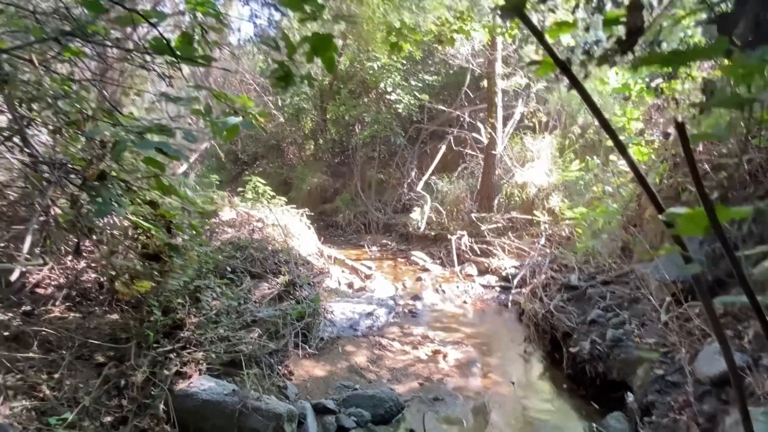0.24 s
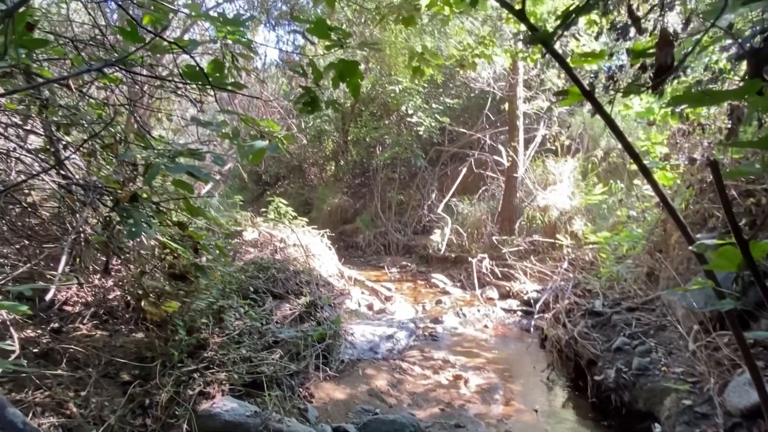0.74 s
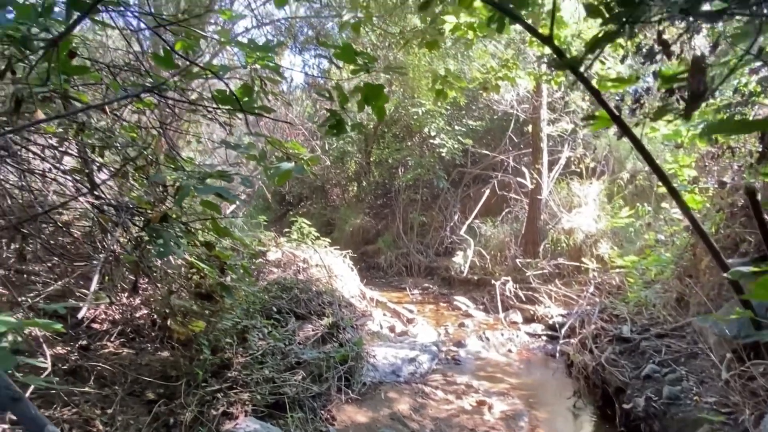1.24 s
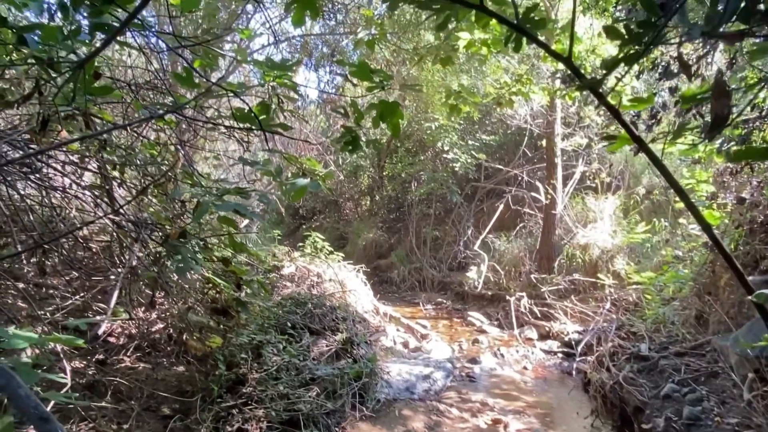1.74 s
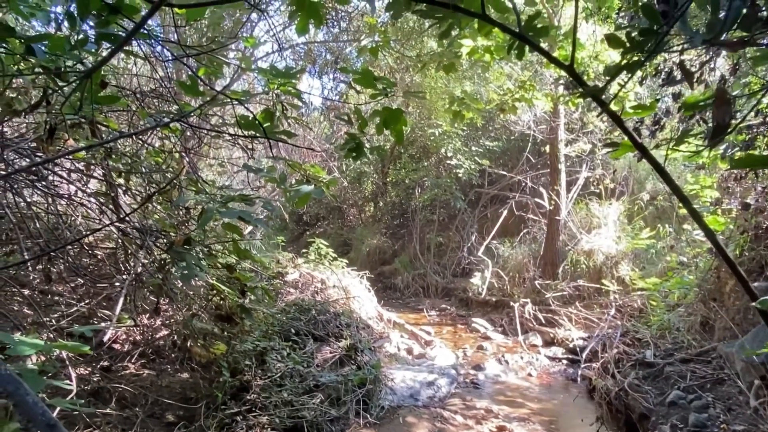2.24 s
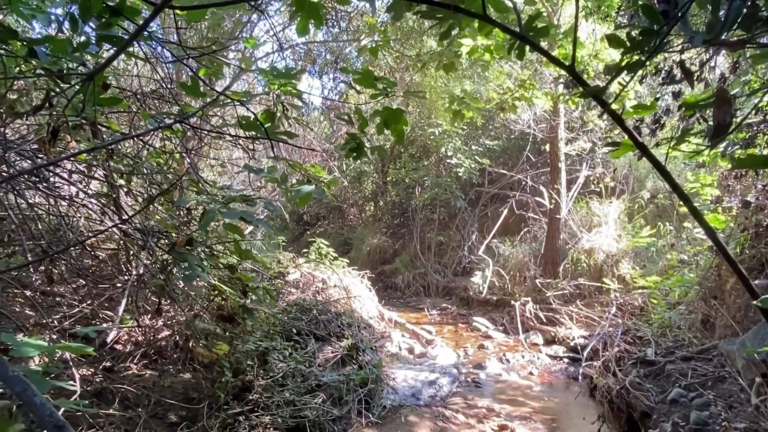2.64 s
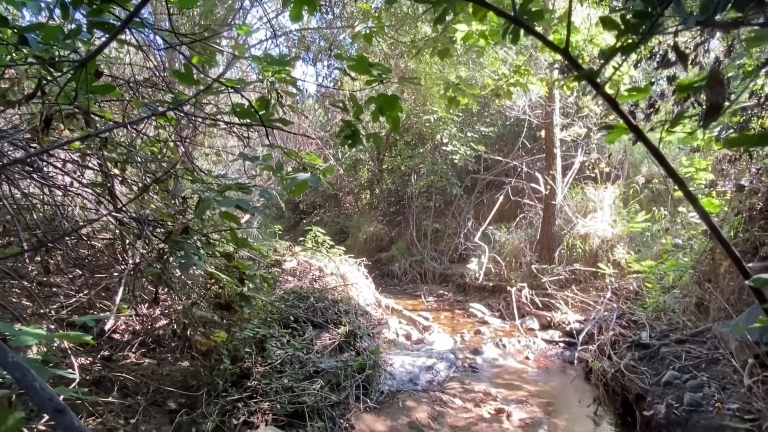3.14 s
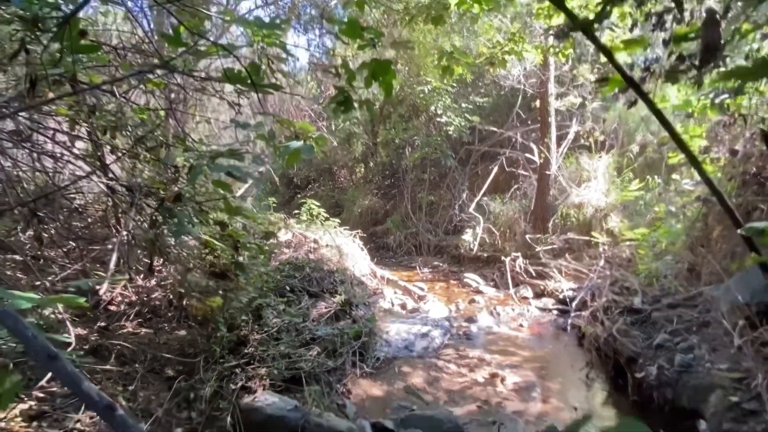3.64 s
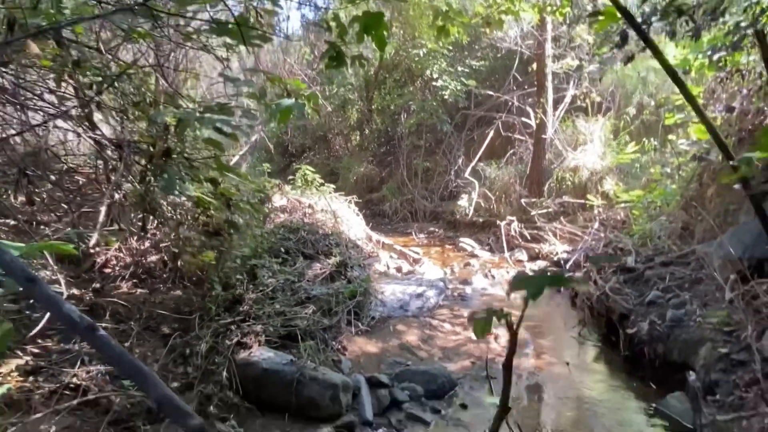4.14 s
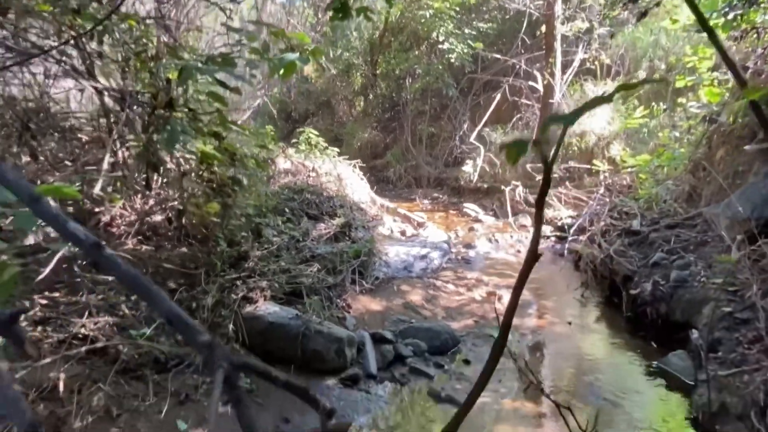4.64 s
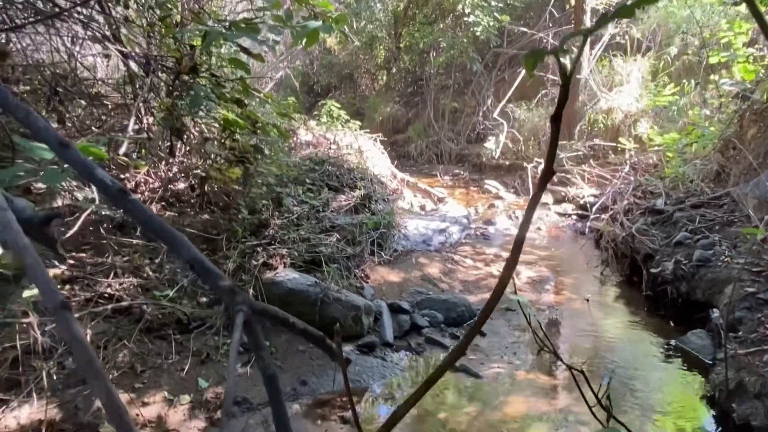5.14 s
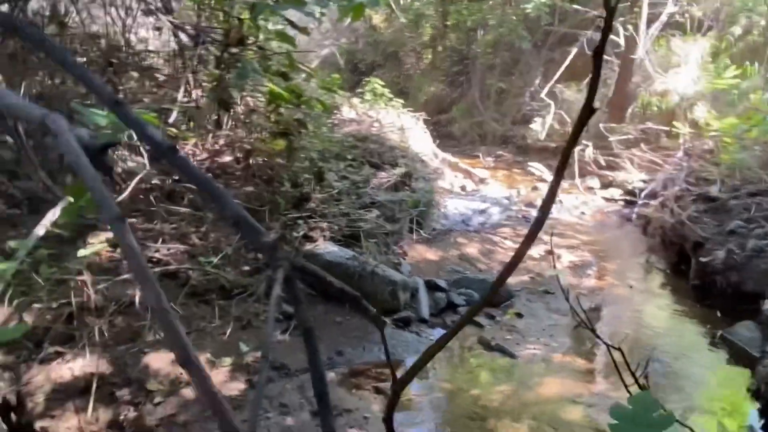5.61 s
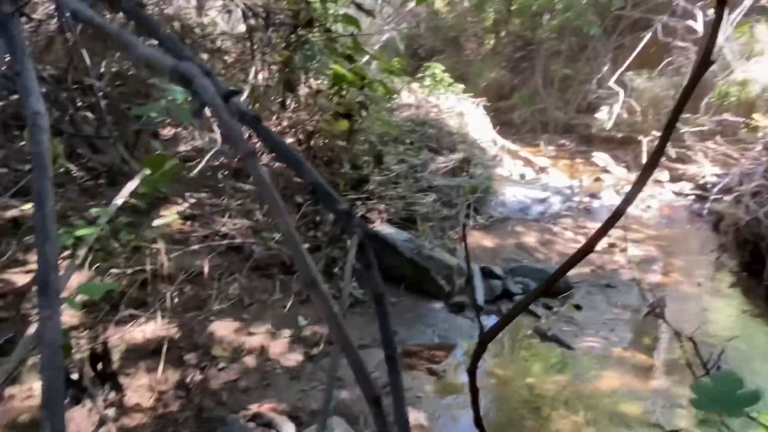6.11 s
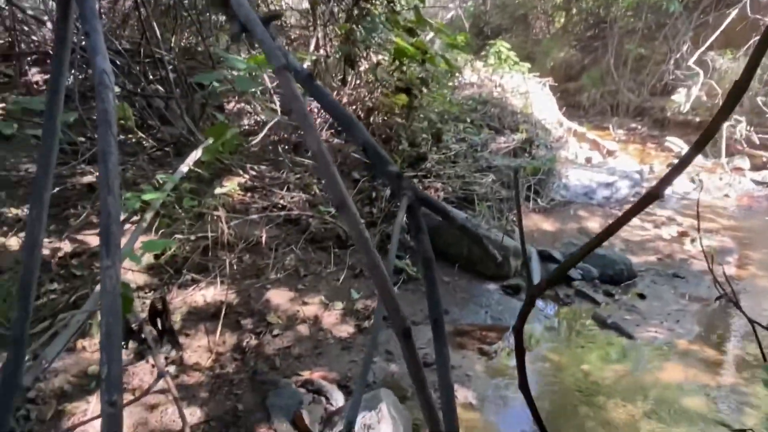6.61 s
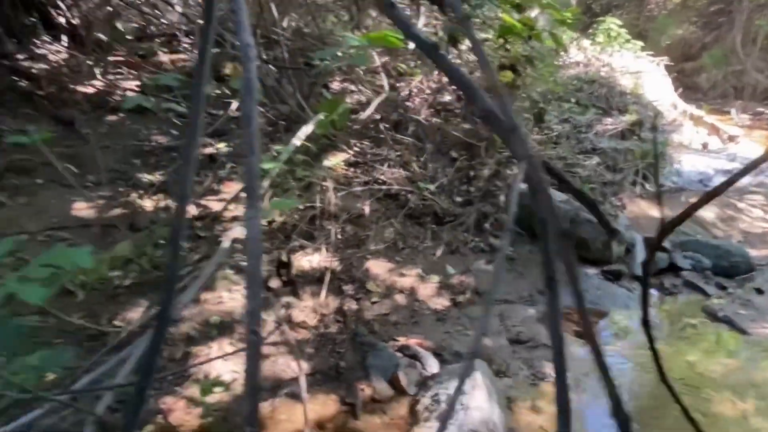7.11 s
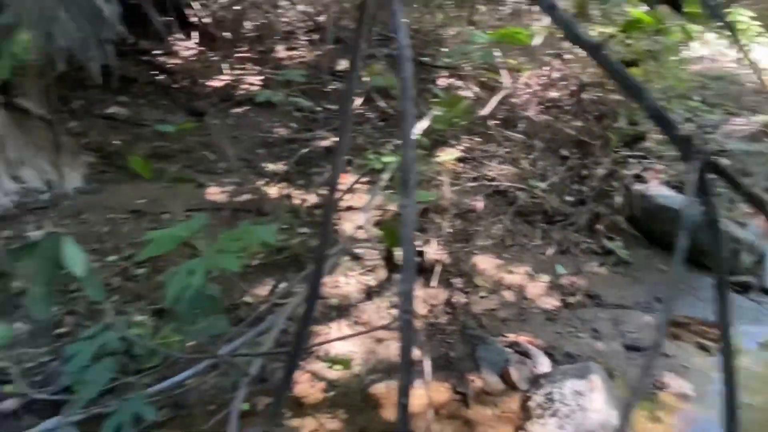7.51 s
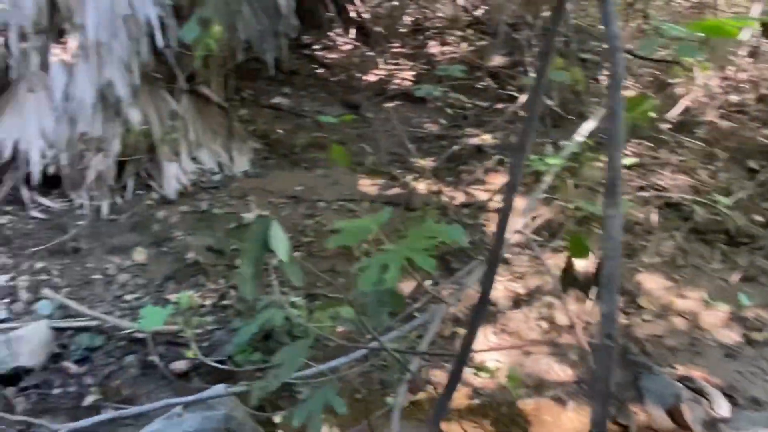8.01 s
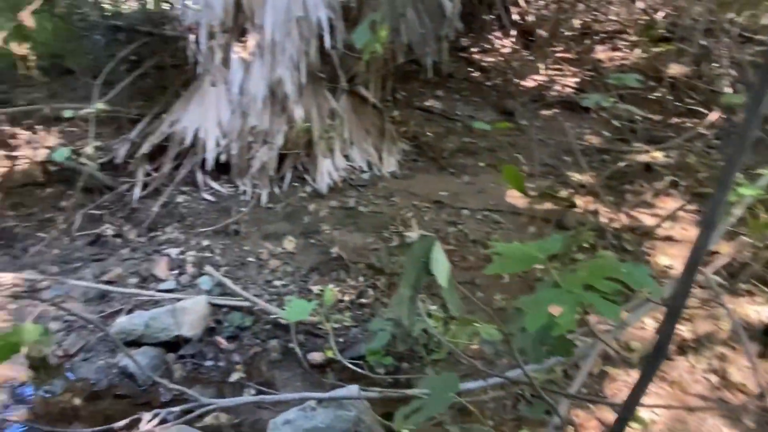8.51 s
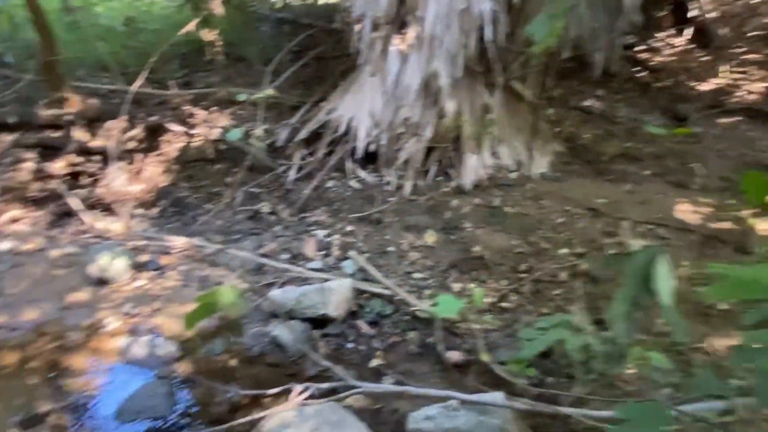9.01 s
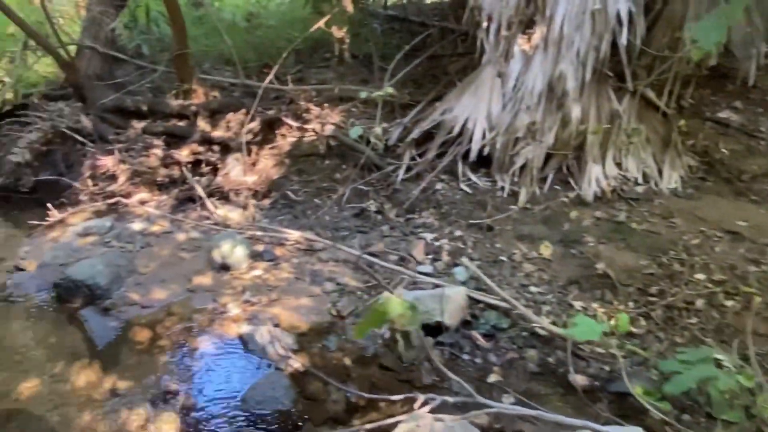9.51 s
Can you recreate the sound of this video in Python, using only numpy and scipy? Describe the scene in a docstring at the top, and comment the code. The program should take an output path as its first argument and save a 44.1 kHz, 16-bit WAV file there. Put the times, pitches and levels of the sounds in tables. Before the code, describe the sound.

Steady creek babble with low wind buffeting, a dull thump midway, then footsteps in dry leaves, sharp twig clicks and a final gritty stone scrape.

```python
"""A shallow creek trickles over stones throughout: shaped hiss, clumped splashes and rising bubble tones.
A gust rumbles at the phone's two ports for almost four seconds, with a brief flutter near its end.
Just before six seconds one large bubble glides up, low pulses thump and the phone turns from the creek.
From about seven seconds feet rustle in dry leaves and twigs tick; near the end a shoe scrapes a stone.
At times a sliding edge in frequency thins out the creek, leaves, twigs and scrape's swish below it."""
import sys
import numpy as np
from scipy import signal
from scipy.fft import rfft, irfft, next_fast_len
from scipy.io import wavfile
from scipy.ndimage import uniform_filter1d, map_coordinates

SR = 44100
rng = np.random.default_rng(int(sys.argv[2]) if len(sys.argv) > 2 else 0)


def int16_out(signal):
    """Quantize to a 16-bit WAV file."""
    q = np.round(np.clip(np.atleast_2d(signal).T, -1, 1) * 32767)
    wavfile.write(sys.argv[1], SR, q.astype(np.int16))


def makeup_ratio(level_db):
    """Linear amplitude ratio for a level in decibels (20 dB per factor of ten)."""
    decades = np.asarray(level_db, float) / 20
    return 10 ** decades


N = 429975  # samples
TIME = np.arange(N) / SR  # s
HZ = np.fft.rfftfreq(512, 1 / SR)  # bins of the short-time spectrum
FRAMES = np.arange(N // 256 + 2) * 256 / SR  # s, its frame times


def unit(x):
    """Scale to rms 1."""
    return x / np.sqrt(np.mean(x ** 2) + 1e-20)


def along(points, hz=HZ):
    """Read (frequency, value) points on a log axis."""
    f, v = np.transpose(points)
    return np.interp(np.log(hz + 1), np.log(f + 1), v)


def curves(rows, at=TIME):
    """Read each column after the first at the given times (or frequencies)."""
    first, *columns = np.transpose(rows)
    return [np.interp(at, first, column) for column in columns]


def wobble(rate):
    """A smooth random curve, rate knots a second."""
    knots = rng.standard_normal(int(N * rate / SR) + 4)
    return map_coordinates(knots, [np.arange(N) * rate / SR])


def noise():
    """Two independent streams of white noise."""
    return rng.standard_normal((2, N))


def shaped(x, gain):
    """x times a gain over frequency and time."""
    z = signal.stft(x, nperseg=512)[2]
    return signal.istft(z * gain[..., :z.shape[-1]], nperseg=512)[1][..., :N]


def coloured(x, points):
    """x through a (frequency, dB) spectrum, at rms 1."""
    m = next_fast_len(N + 8192)
    gain = makeup_ratio(along(points, np.fft.rfftfreq(m, 1 / SR)))
    return unit(irfft(rfft(x, m) * gain, m)[..., :N])


def ports(pair, alike, lead, tilt_db):
    """Two streams to left and right: a shared part, a phase lead [rad] and a level tilt."""
    angle = np.arccos(np.clip(alike, 0, 1)) / 2
    half = makeup_ratio(tilt_db / 2) * np.exp(.5j * lead) * np.ones((len(HZ), len(FRAMES)))
    shared = shaped(pair[0], np.cos(angle) * np.array([half, 1 / half]))
    opposed = shaped(pair[1], np.sin(angle) * np.array([half, -1 / half]))
    return shared + opposed


def blips(s, hz, size, cycles, rise, soft=1, count=700):
    """Damped sines of count samples with a soft start; rise above 0 lifts the pitch."""
    k = np.arange(count)
    c = k / SR * hz[:, None]  # cycles since the start
    envelope = size[:, None] * np.exp(-c / cycles) * (1 - np.exp(-c / soft))
    wave = envelope * np.sin(2 * np.pi * c * (1 + rise * c / cycles))
    index = np.round(s * SR).astype(int)[:, None] + k
    return np.bincount(index.ravel(), wave.ravel(), N + len(k))[:N]


def grains(count, centre_hz, octaves, spread_db, cycles, rise, soft=1):
    """A random crowd of blips at rms 1: half in clumps that start suddenly and thin out, a few larger."""
    when, size, late = rng.random((3, count))
    when[::2] = rng.choice(rng.random(count // 11), len(when[::2]))
    start = np.minimum(when * N / SR - .012 * np.log(late), N / SR)
    hz = np.clip(centre_hz * 2 ** (octaves * rng.standard_normal(count)), 650, 15000)
    return unit(blips(start, hz, makeup_ratio(-spread_db * np.log(size + .02)), cycles, rise, soft))


# spectrum of the rushing water: (frequency [Hz], relative level [dB])
WATER_SPECTRUM = [(480, -40.5), (620, -2), (720, -11), (900, -7), (1360, -11.5), (2000, -11), (4000, -14),
                  (5500, -20), (6300, -19), (7500, -25.5), (10400, -20), (11400, -29.5), (12100, -28),
                  (14000, -34), (15300, -36.5), (16000, -65.5)]


def rush(surge):
    """Many small falls: hiss, patchy in time and frequency, that surges, with clumps of short splashes."""
    patches = rng.standard_normal((len(HZ), len(FRAMES)))
    for axis in (0, 1):
        patches = uniform_filter1d(patches, size=6, axis=axis)
    hiss = coloured(shaped(noise(), makeup_ratio(2.0 * unit(patches))), WATER_SPECTRUM) * surge
    drops = [grains(count=2000, centre_hz=2500, octaves=.8, spread_db=4.4, cycles=2.1, rise=0, soft=.15)
             for _ in 'ab']
    splash = coloured(np.diff(drops, prepend=0), WATER_SPECTRUM)
    return makeup_ratio(-51.5) * hiss + makeup_ratio(-55.5) * splash


def bubble_crowd(surge):
    """Small bubbles ring as damped tones of slightly rising pitch and follow the surge weakly."""
    crowd = [grains(count=3600, centre_hz=1900, octaves=.65, spread_db=3.5, cycles=6.5, rise=.02, soft=.5)
             for _ in 'ab']
    return makeup_ratio(-50) * np.array(crowd) * np.sqrt(surge)


# the loudest bubbles: (time [s], strength [dB], starting pitch [Hz])
LOUD_BUBBLES = [(0.262, -35.5, 1590), (0.517, -37.5, 870), (0.559, -27.5, 2320), (0.623, -27.5, 1630),
                (0.694, -30.5, 1160), (0.954, -34, 1640), (1.103, -29, 1930), (1.358, -30.5, 960),
                (1.544, -26, 2370), (1.932, -28, 1130), (2.216, -27.5, 1750), (2.344, -27, 2280),
                (2.41, -29, 1780), (2.463, -27.5, 3900), (2.508, -27.5, 2660), (3.147, -29.5, 1950),
                (3.245, -30.5, 2080), (3.62, -27.5, 1660), (3.735, -30.5, 1860), (5.909, -27, 2360),
                (6.106, -29, 1570), (6.222, -27, 1940), (6.438, -30.5, 1130)]
# one large bubble, single row: (time [s], strength [dB], starting pitch [Hz])
GLIDING_BUBBLE = (5.722, -39, 520)


def single_bubbles():
    """Loud bubbles ring almost level in pitch; a large one rings longer and glides far up."""
    s, db, hz = np.transpose(LOUD_BUBBLES)
    loud = blips(s, hz, makeup_ratio(db), cycles=4.05, rise=0.0039, soft=0.55)
    s, db, hz = np.transpose([GLIDING_BUBBLE])
    return loud + blips(s, hz, makeup_ratio(db), cycles=11, rise=0.28, count=2600)


def creek():
    """The water's rush and bubble crowd share one uneven surge; single bubbles stand apart."""
    surge = makeup_ratio(1.5 * wobble(9) + 1.8 * wobble(19))
    return rush(surge), bubble_crowd(surge), single_bubbles()


# dry-leaf swells: (time of the peak [s], strength [dB], fade [dB per s])
LEAF_SWELLS = [(7.183, -41, 222), (7.41, -48, 70), (7.642, -40.5, 170), (7.71, -50, 146), (9.4, -50.5, 84),
               (9.52, -41, 85), (9.61, -46, 89)]
# spectrum of dry leaves: (frequency [Hz], relative level [dB])
LEAF_SPECTRUM = [(250, -54), (500, 1.5), (1300, 2.5), (2800, -2.5), (6100, -6), (7400, -11), (9700, -5.5),
                 (12000, -16.5), (15000, -34), (16200, -53.5)]


def leaves():
    """Dry leaves rustle and crackle: noise and tiny clicks swell unevenly over a shuffle."""
    rise_over_fade, shuffle_s, shuffle_db = 1.8, 7.12, -50  # the shuffle lasts from then on
    crackle = [grains(count=2500, centre_hz=6000, octaves=.7, spread_db=3, cycles=1.2, rise=0)
               for _ in 'ab']
    rustle = coloured(noise() + 0.34 * np.array(crackle), LEAF_SPECTRUM) * makeup_ratio(.8 * wobble(30))
    swells = sum(makeup_ratio(db - fade_db * np.maximum(TIME - s, rise_over_fade * (s - TIME)))
                 for s, db, fade_db in LEAF_SWELLS)
    shuffle = makeup_ratio(shuffle_db + 1.5 * wobble(6)) * np.clip((TIME - shuffle_s) / 0.02, 0, 1)
    return ports(rustle * (swells + shuffle), 0.68, 1.35, -1.9)


# twig ticks: (time [s], strength [dB], pitch [Hz], left minus right [dB])
TWIG_TICKS = [(7.1458, -21, 9600, 1), (7.951, -23, 9150, -1.5), (7.9985, -21, 10000, 4),
              (8.0998, -25, 10160, 8), (8.428, -17.5, 6840, 8), (9.363, -27, 990, 0), (9.627, -19, 9100, 4),
              (9.662, -20.5, 3730, 0), (9.669, -8.5, 9950, -9)]


def twigs():
    """Twigs tick as tones that die within a few cycles, each with its own left-right balance."""
    s, db, hz, pan_db = np.transpose(TWIG_TICKS)
    return np.array([blips(s, hz, makeup_ratio(db + side * pan_db / 2), cycles=2.1, rise=0) for side in (1, -1)])


# friction of the shoe: (time [s], force [dB])
SCRAPE_FORCE = [(9.46, -33), (9.485, -16), (9.56, -11.5), (9.59, -6), (9.63, -11), (9.68, -13), (9.7, -29),
                (9.75, -28.5)]
# slips on the stone: (time [s], force [dB])
STONE_SLIPS = [(9.481, -2), (9.575, 2), (9.591, 0), (9.612, 7), (9.66, 6), (9.674, -3), (9.72, -2.5)]
# resonances at first contact: (frequency [Hz], pole width [Hz], level [dB], drift [Hz per s], fade [dB per s])
STONE_MODES = [(800, 138, -4.5, 450, -6), (1370, 110, -8, 0, 10), (1713, 152, 0, -600, 54)]


def stone_ring():
    """Rough friction and sudden slips excite the stone's narrow resonances, which drift a little."""
    since = TIME - SCRAPE_FORCE[0][0]
    force = makeup_ratio(curves(SCRAPE_FORCE)[0] + 1.9 * wobble(90)) * noise() * (since > 0)
    for s, db in STONE_SLIPS:
        force[0, round(s * SR):][:12] += makeup_ratio(db) * np.hanning(12)
    ring = 0
    for hz, width_hz, db, drift, fade_db in STONE_MODES:
        # shift the mode to 0 Hz, low-pass it there, shift it back
        spin = np.exp(2j * np.pi * since * (hz + drift * since / 2))
        keep = np.exp(-np.pi * width_hz / SR)
        slow = signal.lfilter([(1 - keep) ** 2], [1, -2 * keep, keep ** 2], force / spin)
        level = makeup_ratio(db - fade_db * np.maximum(since, 0) + 1.7 * wobble(60))
        ring = ring + 2 * level * np.real(spin * slow)
    return ports(ring, .9, 1.2, -3.5)


# spectrum of the scrape's swish: (frequency [Hz], relative level [dB])
SWISH_SPECTRUM = [(1300, -28), (2100, 8), (4500, -10.5), (7000, -40)]


def scrape_swish():
    """A broad swish of noise follows the friction force."""
    level = makeup_ratio(curves(SCRAPE_FORCE)[0] - 30) * (TIME > SCRAPE_FORCE[0][0])
    return ports(level * coloured(noise(), SWISH_SPECTRUM), .9, 1.2, -3.5)


# short low pulses, the three near 5.97 s in one thump, the last a faint knock:
# (time of the peak [s], strength [dB], pitch [Hz], time constant [s])
LOW_PULSES = [(5.604, -28, 287, 0.0046), (5.857, -27.5, 255, 0.0076), (5.882, -26.5, 234, 0.0045),
              (5.9695, -21, 466, 0.0022), (5.9731, 0.5, 338, 0.00069), (5.9795, -20.5, 315, 0.0044),
              (8.672, -40, 296, 0.002)]


def low_pulses():
    """Short low tones swell and fade evenly: thumps, one built of three pulses, and a faint late knock."""
    tones = sum(makeup_ratio(db) * np.exp(-np.abs(TIME - s) / fade_s) * np.cos(2 * np.pi * hz * (TIME - s))
                for s, db, hz, fade_s in LOW_PULSES)
    spectrum = [(60, -86), (140, -44.5), (185, -1), (530, 3.5), (600, -15.5), (1500, -8.0), (3000, -60)]
    pulses = coloured(tones, spectrum) * np.std(tones)
    return ports([pulses, 0 * TIME], 0.96, -1.73, 1.44)


# wind rumble: (time [s], level [dB])
RUMBLE_LEVEL = [(0.0, -60), (0.32, -50.5), (0.6, -65.5), (0.73, -53.5), (1.22, -45.5), (2.36, -46.5),
                (3.64, -45), (3.72, -58), (4.02, -55), (4.45, -80.5), (5.02, -77), (5.16, -55),
                (5.24, -66.5), (5.57, -64.5), (5.65, -100), (6.11, -95.5), (6.49, -60.5), (6.68, -119),
                (6.95, -73.5), (7.71, -55.5), (8.23, -64.5), (8.28, -53), (8.55, -69), (9.15, -60.5),
                (9.38, -57.5), (9.59, -49), (9.75, -55)]
# rumble spectrum: (frequency [Hz], relative level in the long gust [dB], relative level after it [dB])
RUMBLE_SPECTRA = [(18, -32, -35), (39, -11.5, -21.5), (62.5, -2, 4), (95.5, -4, 6.5), (158, -24.5, -8),
                  (235, -60, -38)]


def rumble():
    """Lumpy low noise of the wind, with one colour in the long gust and another after it."""
    gust_ends_s = 3.7
    hz, *colours = np.transpose(RUMBLE_SPECTRA)
    gust, calm = (coloured(noise(), np.transpose([hz, db])) for db in colours)
    lumpy = unit(makeup_ratio(1.07 * wobble(9)) * np.where(np.arange(N) < gust_ends_s * SR, gust, calm))
    return ports(makeup_ratio(curves(RUMBLE_LEVEL)[0]) * lumpy, 0.78, -0.19, -5.0)


# wind flutter: (time [s], level [dB])
FLUTTER_COURSE = [(0, -66), (1.2, -58), (3.3, -57.5), (3.34, -45), (3.41, -44.5), (3.46, -57), (3.53, -46),
                  (3.62, -44), (3.68, -62), (4.3, -64), (5.5, -64.5), (5.7, -74), (6.05, -59), (6.5, -68),
                  (6.6, -105), (6.77, -105), (6.83, -70), (7.33, -53), (7.66, -53), (8.05, -61), (9, -60),
                  (9.3, -67.5), (9.5, -53.5), (9.75, -56.5)]
# flutter spectrum: (frequency [Hz], relative level [dB])
FLUTTER_SPECTRUM = [(90, -42), (140, -2.5), (300, -5.5), (455, -2.5), (600, -5.5), (760, -52.5)]


def flutter():
    """Faster, rougher noise of the wind, mostly above the rumble in pitch."""
    rough = unit(makeup_ratio(2.2 * wobble(25) + 1.2 * wobble(6)) * coloured(noise(), FLUTTER_SPECTRUM))
    return ports(makeup_ratio(curves(FLUTTER_COURSE)[0]) * rough, 0.25, -0.59, -6.5)


# dropouts of a narrow band: (time of the middle [s], half length [s], centre [Hz])
WIND_GAPS = [(4.35, 0.22, 268), (5.754, 0.035, 260), (6.744, .34, 326)]


def wind():
    """Rumble and flutter together, with a narrow band that drops out at times."""
    gap_octaves, gap_db = .5, -25
    gap = sum(np.outer(np.exp(-(np.log2((HZ + 1) / hz) / gap_octaves) ** 2),
                       np.exp(-((FRAMES - s) / half) ** 4)) for s, half, hz in WIND_GAPS)
    return shaped(rumble() + flutter(), makeup_ratio(gap_db * gap))


# slides of the edge: (time it starts down [s], time it climbs back [s], fall [Hz per s])
EDGE_SLIDES = [(-.12, 3.66, 5500), (5.6, 6.56, 12000), (9.43, 9.9, 10500)]


def edge():
    """The edge [Hz] rests high, slides down steadily to a floor and climbs back ever more slowly."""
    top_hz, low_hz, climb_s = 3900, 600, .19
    down_hz = [np.clip(fall * (np.minimum(FRAMES, back) - start), 0, top_hz - low_hz)
               * np.exp(-np.maximum(FRAMES - back, 0) / climb_s) for start, back, fall in EDGE_SLIDES]
    return top_hz - np.max(down_hz, axis=0)


# turn away from the water: (time [s], share of the turn [0-1])
PHONE_TURN = [(5.6, 0), (6.1, 0.86)]
# phase by which left leads: (frequency [Hz], facing the water [rad], turned away [rad])
LEFT_LEAD = [(500, 3.1, 3.1), (900, 1.2, 1.3), (1500, .1, .6), (2500, -.5, -1.5), (4500, -.9, -2.8),
             (6000, -.5, -1.5), (7500, -2.8, -2.8), (9500, -5.5, -5.5), (12000, -9, -9)]
# left-right likeness of the creek: (frequency [Hz], likeness [0-1])
LIKENESS = [(600, 0.81), (1000, 0.94), (2000, 0.85), (5000, 0.49), (9000, 0.39), (12000, 0.36)]
# balance of the creek: (frequency [Hz], left minus right [dB])
BALANCE = [(600, -5.5), (1400, -5.5), (3000, -0.5), (7000, -0.7)]
# base gain under the edge: (time [s], level [dB])
SINK_DEPTH = [(0, -13), (.22, -7.5), (.45, -9), (3.7, -4.5), (4.7, -8.5), (5.15, -12.5), (5.25, -4.5),
              (5.75, -2), (6.5, -6), (6.65, -2), (7, -6), (7.5, -4), (9.08, -8), (9.2, -11.5), (9.45, -9.5)]


def scene():
    """The creek's phase lead shifts as the phone turns; sounds sink below the edge, the bubble crowd most."""
    water, bubbles, single = creek()
    turn, = curves(PHONE_TURN, FRAMES)
    facing, turned = curves(LEFT_LEAD, HZ)
    lead = np.outer(facing, 1 - turn) + np.outer(turned, turn)
    image = along(LIKENESS)[:, None], lead, along(BALANCE)[:, None]
    sink_db = curves(SINK_DEPTH, FRAMES)[0] / (1 + (HZ[:, None] / edge()) ** 24)
    sunk = shaped(ports(water, *image) + leaves() + twigs() + scrape_swish(), makeup_ratio(sink_db))
    sunk_bubbles = shaped(ports(bubbles, *image), makeup_ratio(1.7 * sink_db))
    clear = ports([single, 0 * single], *image) + stone_ring() + low_pulses() + wind()
    return sunk + sunk_bubbles + clear


def band_limit(x):
    """A steep low-pass at the top of the band."""
    return signal.sosfilt(signal.butter(12, 16500, fs=SR, output="sos"), x)


def record(dry):
    """The finished mix as the phone delivers it."""
    return band_limit(dry)


dry = scene()
out = record(dry)
int16_out(out)
```